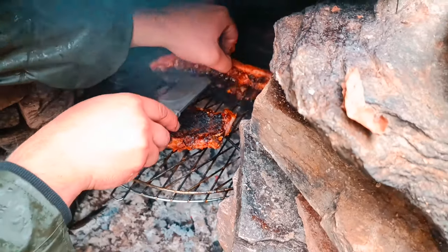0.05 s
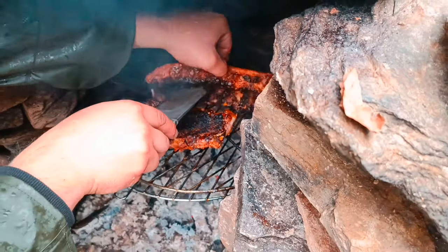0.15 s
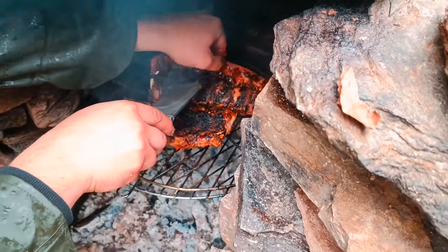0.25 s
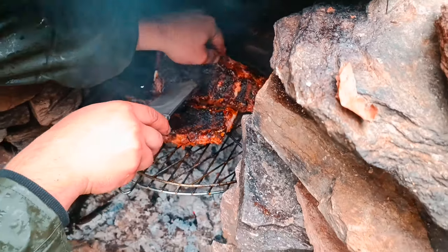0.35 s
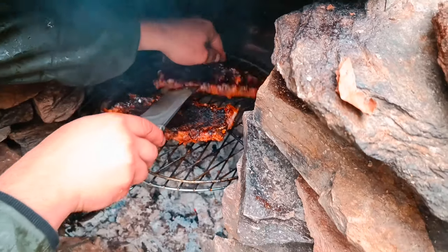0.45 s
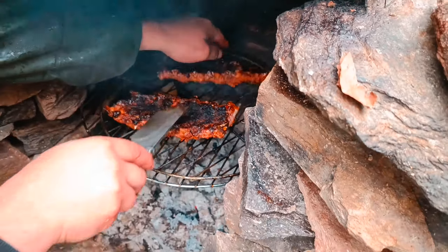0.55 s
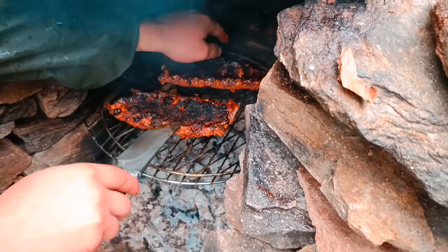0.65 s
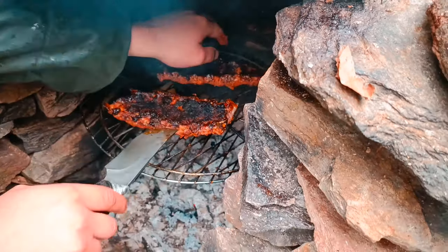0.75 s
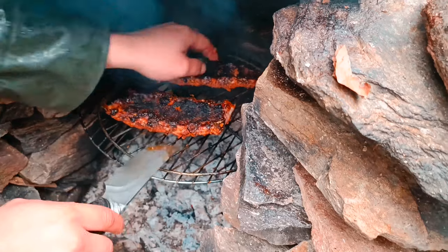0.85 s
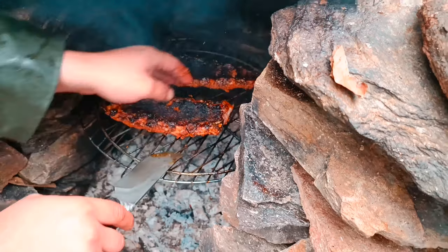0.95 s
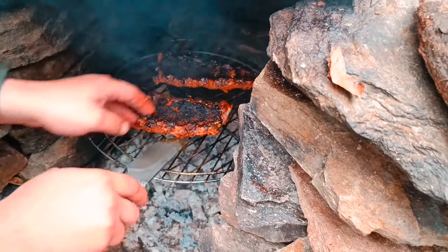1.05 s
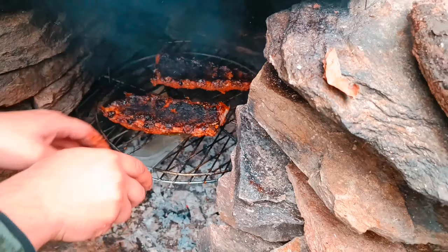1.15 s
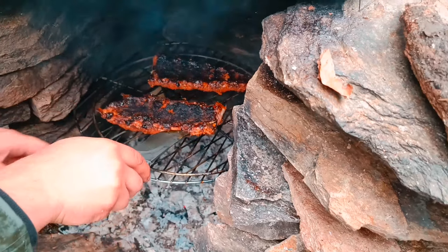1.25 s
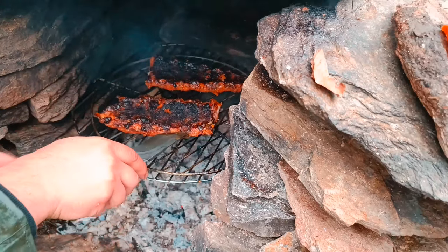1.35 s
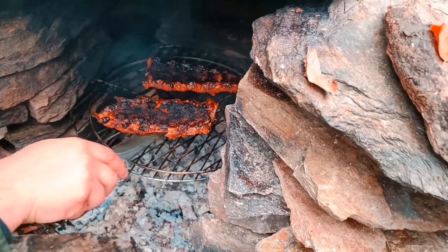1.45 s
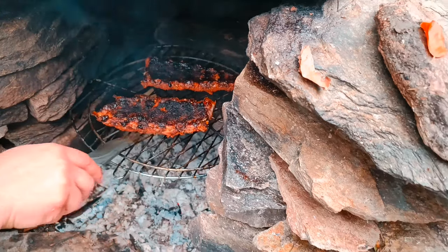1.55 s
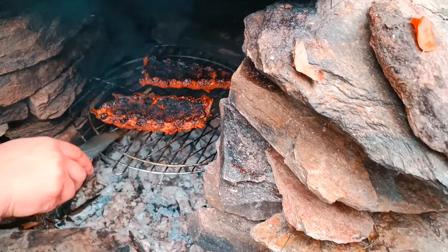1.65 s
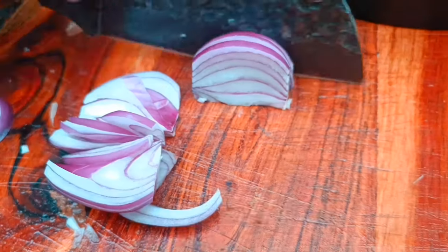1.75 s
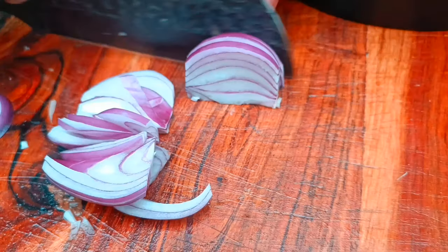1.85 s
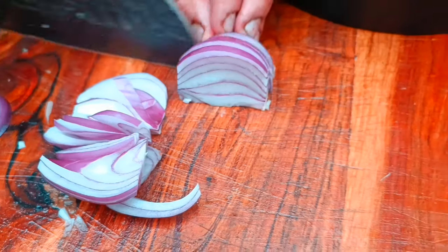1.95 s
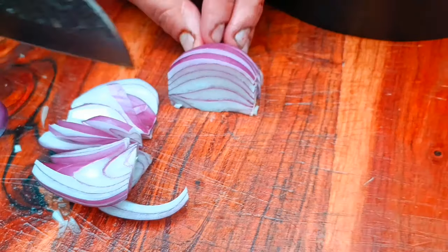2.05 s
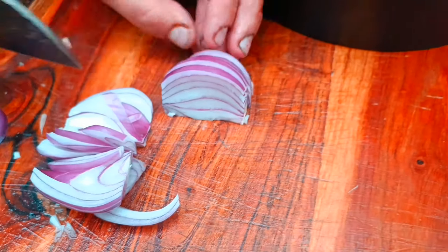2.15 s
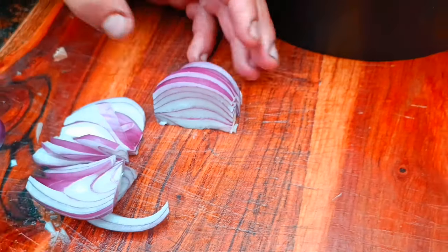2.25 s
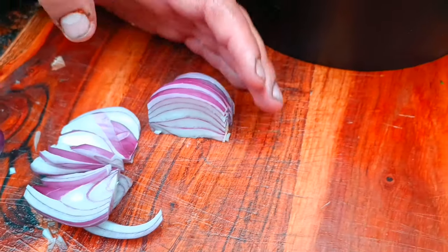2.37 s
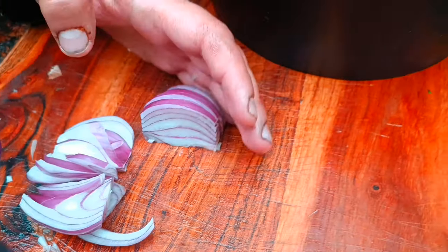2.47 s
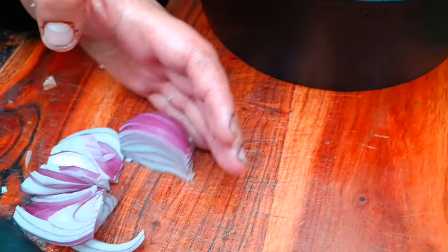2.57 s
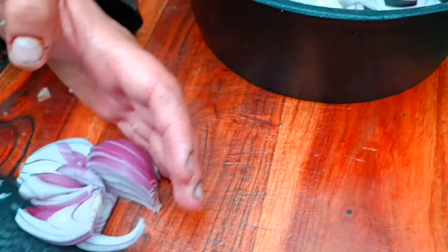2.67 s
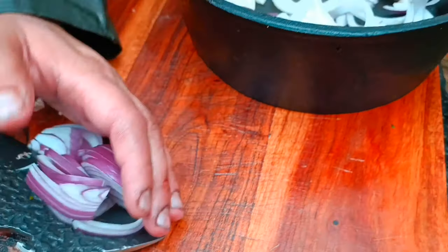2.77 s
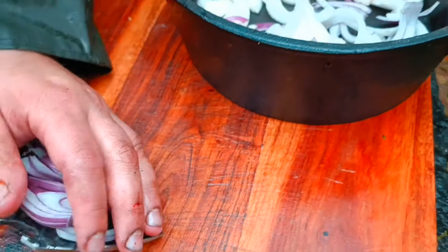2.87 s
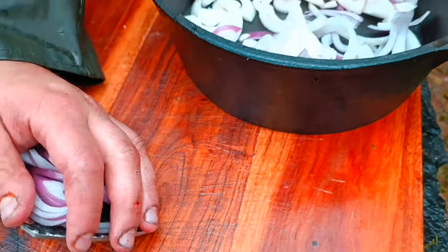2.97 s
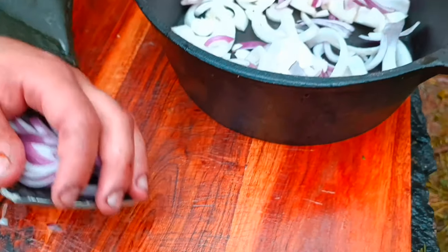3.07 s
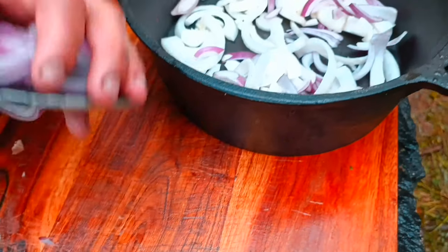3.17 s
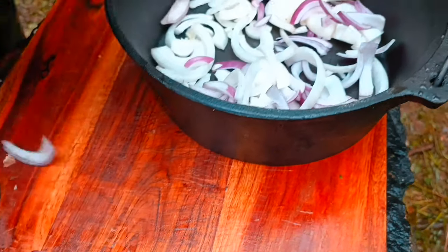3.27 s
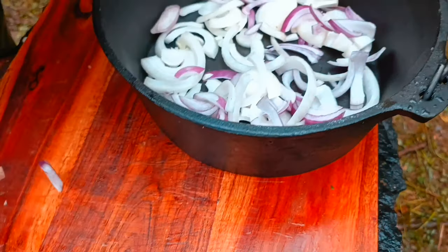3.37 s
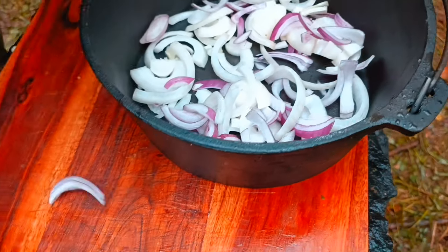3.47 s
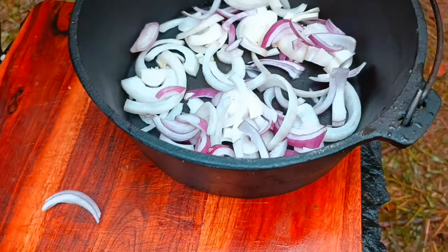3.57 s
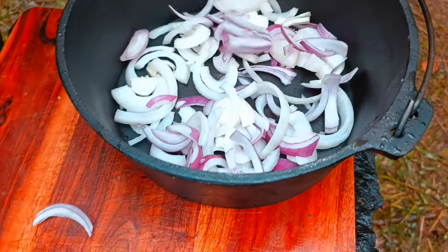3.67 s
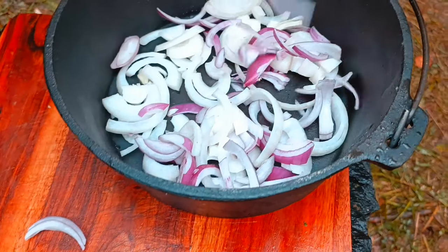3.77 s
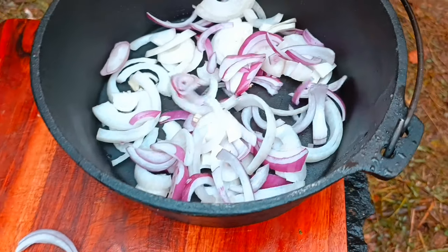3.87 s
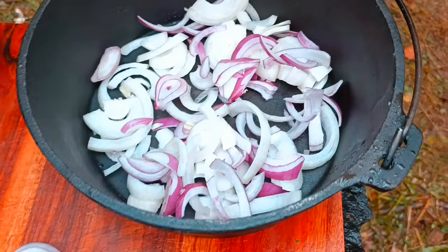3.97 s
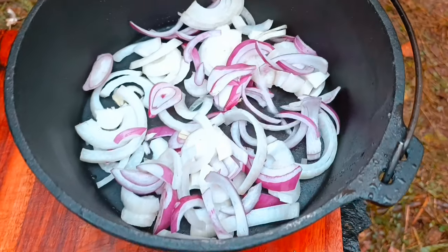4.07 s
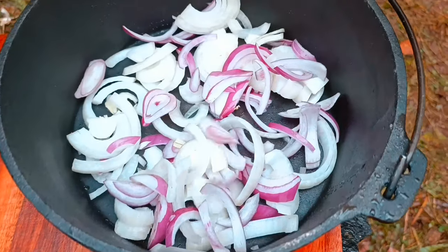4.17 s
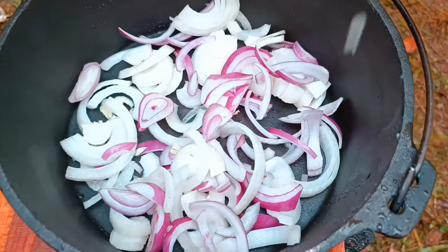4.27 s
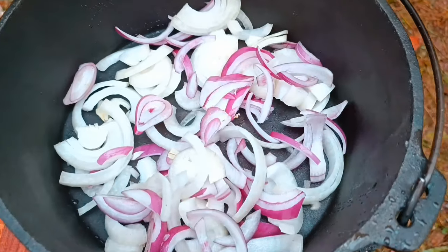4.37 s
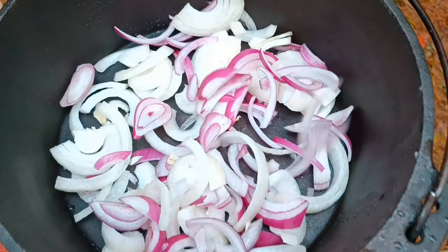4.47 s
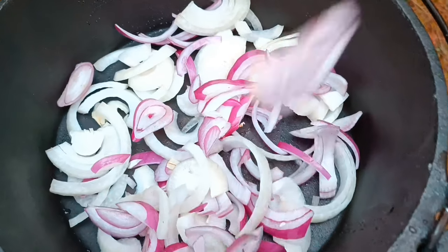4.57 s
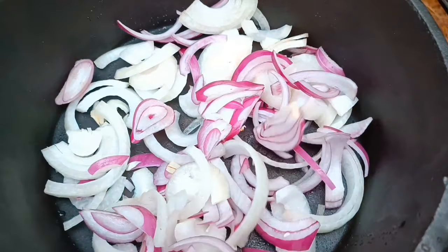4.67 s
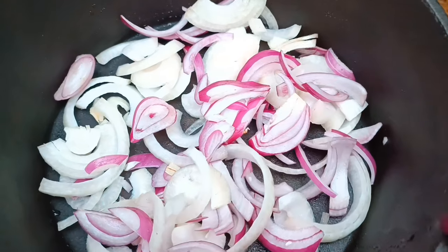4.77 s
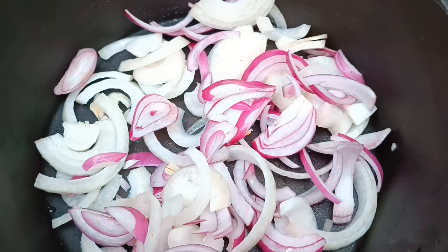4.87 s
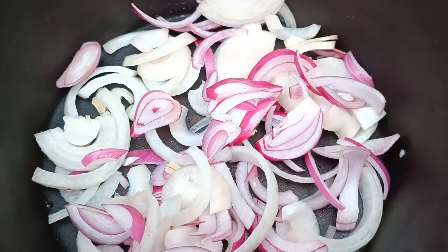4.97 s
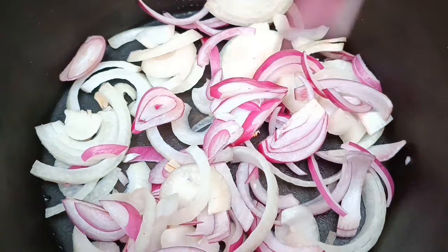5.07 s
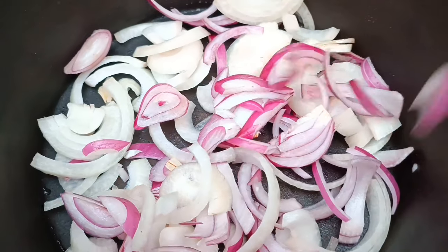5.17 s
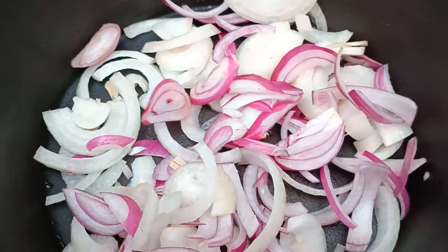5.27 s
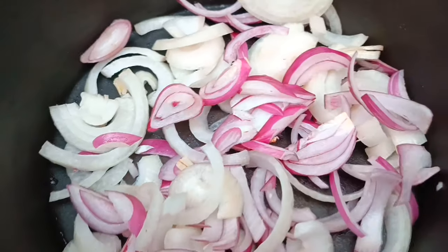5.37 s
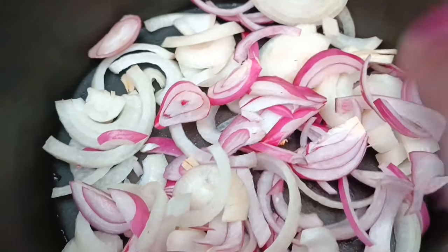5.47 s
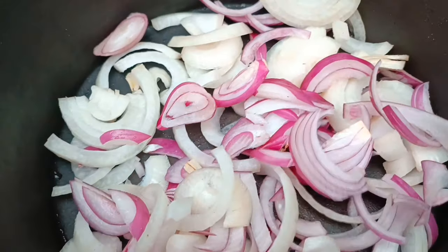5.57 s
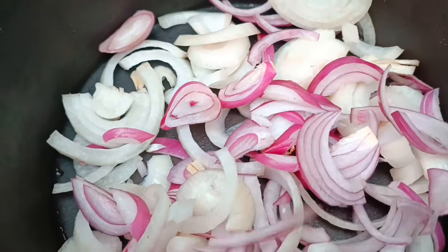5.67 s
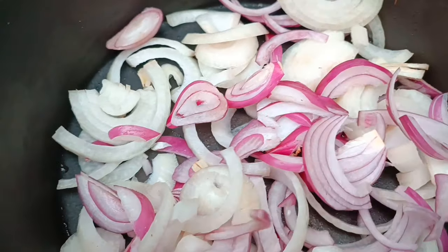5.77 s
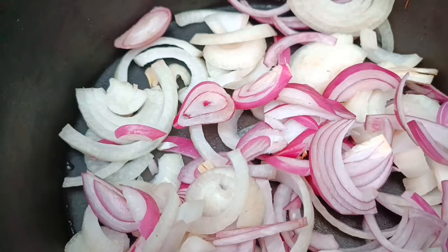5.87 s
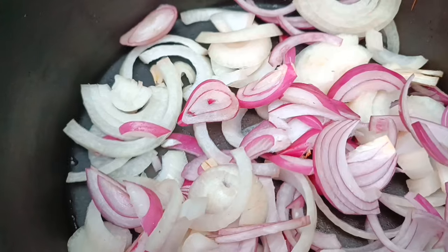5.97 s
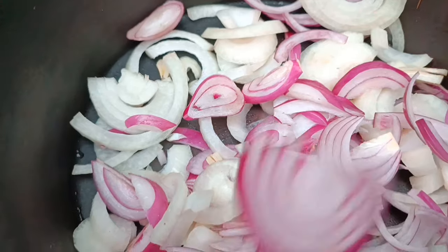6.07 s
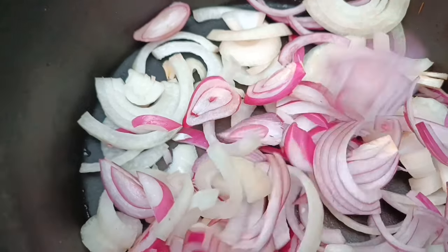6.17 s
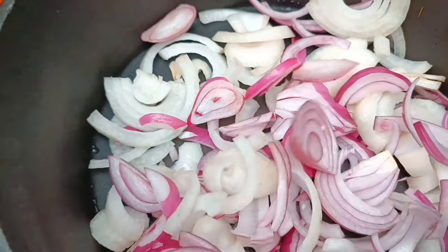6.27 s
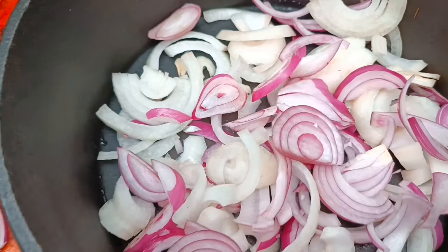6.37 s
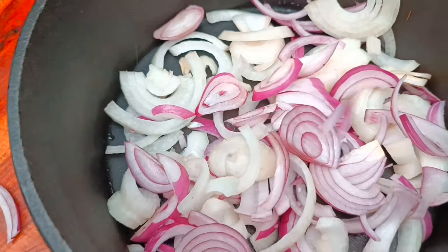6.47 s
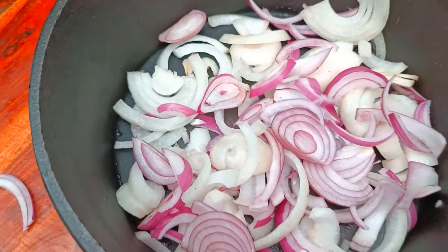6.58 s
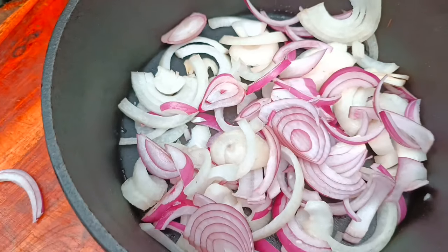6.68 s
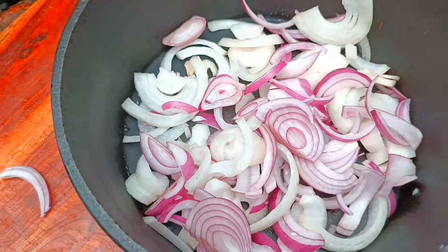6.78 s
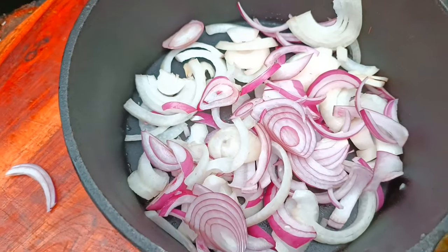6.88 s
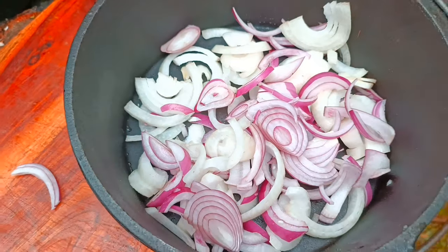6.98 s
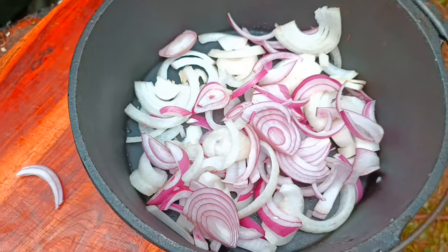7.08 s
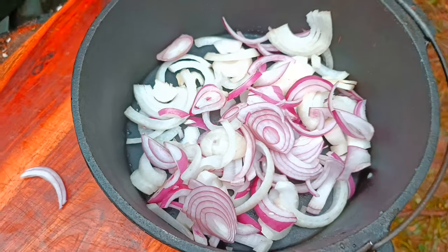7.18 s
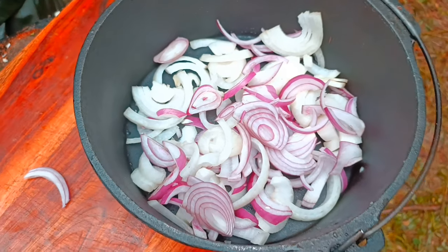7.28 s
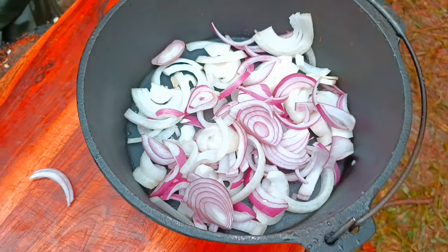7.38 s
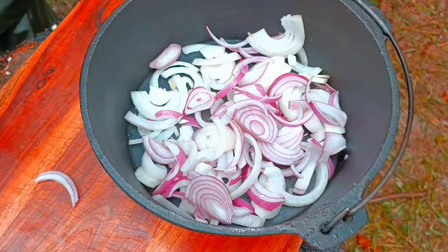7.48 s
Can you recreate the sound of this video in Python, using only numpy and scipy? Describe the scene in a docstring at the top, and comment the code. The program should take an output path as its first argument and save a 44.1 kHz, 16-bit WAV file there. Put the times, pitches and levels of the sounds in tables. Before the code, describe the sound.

A close, dry stereo outdoor scene with a soft low rumble throughout. From 0 to 1.6 s fat sizzles faintly as fine crackle on the left, swelling near 0.7 s, with sleeve rustle and dull soft bumps around 0.2 and 1.0 s. At 1.65 s the sound drops out for an instant, then a blade knocks hard on a wooden board at 1.75 s, short and damped. Cloth rustles more strongly while the edge drags with a hollow rasp until 2.1 s. Another solid knock lands at 2.56 s, with lighter ones and quick gritty scooping slips to 2.9 s. From 3 to 4.3 s onion slices patter and tick wetly, densest near 3.9 s. At 4.8 s steel rattles in a brief bright, quiet ring. Sparse ticks and taps continue from 5.15 to 6.6 s, a soft bump comes at 6.9 s, and a last tick at 7.5 s.

```python
"""Chopping board by the fire pit

Hands work beside an outdoor fire pit, heard by two spaced microphones.
A cleaver knocks on a wooden board (damped wood tones), then slides and scoops up sliced onion (rough slips).
It rattles on metal (ringing steel tones); slices patter and tick (tiny clicks and short noise bursts).
Fat sizzles at first and sleeves rustle (crackling noise) over soft bumps and a low outdoor rumble.
Early on, the sound drops out for a moment."""
import sys
import numpy as np
from scipy import signal
from scipy.fft import rfft, irfft, next_fast_len
from scipy.io import wavfile

SR = 44100
rng = np.random.default_rng(int(sys.argv[2]) if len(sys.argv) > 2 else 0)


def store_pcm(level_fs):
    """Save levels as 16-bit WAV."""
    pcm = np.round(np.clip(level_fs, -1, 1) * 32767).astype(np.int16)
    wavfile.write(sys.argv[1], SR, np.atleast_2d(pcm).T)


N = 332073

SPACING_MS, FULL_SIDE_DB = 0.42, 3.5    # longest lag between microphones; level difference that nears it


def amp(db):
    """Turn dB into a plain gain."""
    return 10 ** (np.asarray(db) / 20)


def rms_one(x):
    """Scale to an average strength (rms) of 1."""
    return x / np.sqrt(np.mean(x ** 2) + 1e-20)


def in_time(rows):
    """Draw straight lines between table rows, one value per sample for each column."""
    times_s, *columns = np.transpose(rows)
    return [np.interp(np.arange(N) / SR, times_s, column) for column in columns]


def stroke(rows):
    """Gain that follows a level curve and is silent outside it."""
    times_s, levels_db = np.transpose(rows)
    return amp(np.interp(np.arange(N) / SR, times_s, levels_db, left=-200, right=-200))


def at_hz(points, hz):
    """Read a table by pitch, on a log axis as the ear hears pitch."""
    table = np.array(points)
    return np.interp(np.log(hz), np.log(table[:, 0]), table[:, 1])


def band(x, low_hz, high_hz):
    """Keep only the pitches between two limits."""
    sos = signal.butter(2, [low_hz, high_hz], "band", fs=SR, output="sos")
    return signal.sosfilt(sos, x + 1e-18)


def drift(rate_hz):
    """Slow random wandering with a spread of 1, worked out every 40 samples."""
    r = np.exp(-80 * np.pi * rate_hz / SR)
    noise = rng.standard_normal(N // 40 + 2002)
    slow = signal.lfilter([1], [1, -2 * r, r * r], noise)[2000:]    # skip the start-up
    return np.interp(np.arange(N) / 40, np.arange(len(slow)), rms_one(slow))


def resonate(x, hz, width_hz):
    """Ring at one pitch like a struck object; a narrow width rings longer; gain 1 at the peak."""
    r = np.exp(-np.pi * width_hz / SR)
    feed = np.array([1, 0, -1]) * (1 - r * r) / 2
    return signal.lfilter(feed, [1, -2 * r * np.cos(2 * np.pi * hz / SR), r * r], x + 1e-18)


def body(x, peaks, damping=1):
    """An object's tones side by side, with alternating signs; damping widens and so shortens them."""
    return sum((-1) ** k * amp(db) * resonate(x, hz, width_hz * damping)
               for k, (hz, width_hz, db) in enumerate(peaks))


def grains(per_s, spread_db, size):
    """Random clicks of uneven strength, scaled to rms 1."""
    strength = amp(spread_db * np.minimum(rng.exponential(1, size), 5))
    signed = strength * rng.choice([-1, 1], size)
    return rms_one(signed * (rng.random(size) < per_s / SR))


def pair(near, other, alike):
    """Mix two signals into a left and right that are partly the same."""
    share = np.clip(alike, -1, 1)
    common = np.sqrt(1 + share) * near
    opposed = np.sqrt(1 - share) * other * np.array([[1], [-1]])
    return (common + opposed) / np.sqrt(2)


def lead(stereo, ms):
    """Delay the right side (or the left, if negative)."""
    late = int(ms > 0)
    out = stereo.copy()
    out[late] = np.roll(stereo[late], round(abs(ms) * SR / 1000))
    return out


# tones of the wooden board, for knocks and scoops: (f/Hz, undamped width/Hz, relative level/dB)
BOARD_TONES = [(171, 29, -6.5), (391, 21, -4), (519, 32, 1), (750, 40, -6.5), (1034, 43, -7.5),
               (1455, 65, -15), (1875, 82, -13.5)]
# blows on the board: (t/s, peak level before left-right tilt/dB, damping factor [at least 0.5 is used],
#                      settling share [ratio], lowest f stirred/Hz, highest f stirred/Hz)
KNOCK_BLOWS = [(1.668, -19, 4.6, 0.07, 166, 980), (1.7536, -4.5, 3.1, 0.05, 324, 1720),
               (2.5556, -7.5, 1.8, 0.096, 165, 1180), (2.653, -23, 2, .05, 250, 1200),
               (2.743, -17, 1.8, 0.055, 250, 1200), (2.878, -23.5, 3, 0.046, 220, 1300),
               (3.287, -30, 0.82, 0.04, 460, 1780), (3.51, -25, 1.1, 0.078, 670, 1810),
               (3.623, -41.5, 0.75, 0.069, 450, 1800)]


def knocks():
    """A soft push sets the board's tones ringing, damped by the blade that stays on it."""
    length = round(.12 * SR)
    t = np.arange(length) / SR
    noise = rng.standard_normal((len(KNOCK_BLOWS), 2, length))
    out = np.zeros((2, N + length))
    for (s, peak_db, damping, share, low_hz, high_hz), settle in zip(KNOCK_BLOWS, noise):
        push = (t == 0) + share * pair(*settle, 0.91) * np.exp(-t / 0.0067)    # the blow, then the blade settles
        soft = signal.sosfilt(signal.butter(3, high_hz, fs=SR, output="sos"), push)
        ring = band(body(soft, BOARD_TONES, max(damping, .5)), low_hz, 2500)
        edge_crack = 0.0042 * band(settle * np.exp(-t / .002), 3000, 6500)
        knock = ring + edge_crack
        at = round(s * SR)
        out[:, at:at + length] += amp(peak_db) * lead(-knock / np.abs(knock).max(), .1) * amp([[.7], [-.7]])
    return out[:, :N]


SCOOP_RISE_DB_PER_S, SCOOP_FALL_DB_PER_S = 906, 750    # into and out of contact


def scoop_gain(column, swell_db_per_s):
    """Each scoop rises fast, swells while it pushes, then falls away."""
    t, out = np.arange(N) / SR, 0
    for row in SCOOP_PUSHES:
        start_s, push_s = row[:2]
        since, left = t - start_s, start_s + push_s - t
        rise_db = SCOOP_RISE_DB_PER_S * np.maximum(-since, 0)
        swell_db = swell_db_per_s * np.clip(left, 0, abs(push_s))
        fall_db = SCOOP_FALL_DB_PER_S * np.maximum(-left, 0)
        loss_db = rise_db + swell_db + fall_db
        out = out + amp(row[column] - np.minimum(loss_db, 200))
    return out


WOOD_SWELL_DB_PER_S, EDGE_SWELL_DB_PER_S = 46, 113    # the load grows during the push
EDGE_FOCUS_DB = 43    # loss one octave away from the edge pitch
# the flat blade scoops: (t/s, push length/s, wood level at end of push/dB, wet edge level there/dB, edge f/Hz)
SCOOP_PUSHES = [(2.617, 0.039, -32, -39, 5600), (2.682, 0.024, -29.5, -37, 5200),
                (2.717, 0.03, -27.5, -34, 4100), (2.786, 0.023, -65, -48.5, 4620),
                (2.886, 0.014, -34.5, -41.5, 4900), (3.294, 0.0026, -41.5, -44, 5000),
                (3.755, 0.0069, -47, -49, 5000)]
# tones of the wet edge: (f/Hz, width/Hz, relative level/dB)
EDGE_TONES = [(3080, 660, 4), (4100, 460, 2), (5380, 400, -0.5), (6250, 320, -6.5)]


def scoops():
    """Uneven slips ring the board's tones; the wet edge grates above, coloured by the blade's angle."""
    slips = pair(*grains(3000, 2.6, size=(2, N)), 0.94)
    slips = slips * amp(1.9 * np.tanh(drift(35)))    # stick and slip in lumps
    pushed = slips * scoop_gain(column=2, swell_db_per_s=WOOD_SWELL_DB_PER_S)
    wood = body(pushed, BOARD_TONES) / np.std(body(slips, BOARD_TONES))
    grit = grains(2500, 3.45, size=(2, N)) * scoop_gain(column=3, swell_db_per_s=EDGE_SWELL_DB_PER_S)
    pitch_hz, = in_time([(s + push / 2, hz) for s, push, *_, hz in SCOOP_PUSHES])
    ragged = 0
    for hz, width_hz, db in EDGE_TONES:
        off_pitch_db = EDGE_FOCUS_DB * np.log2(hz / pitch_hz) ** 2
        gain = amp(db - off_pitch_db + 4.1 * np.tanh(drift(25)))
        ragged = ragged + resonate(grit * gain, hz, width_hz)
    edge = amp(12.5) * band(ragged, 2650, 8700)
    return lead(band(wood, 91, 2310), .13) * amp([[1.5], [-.4]]) + edge * amp([[2.2], [-2.2]])


# the blade tilts up and back: pitch of the hollow at rest and at full tilt, middle and half-length of the tilt
DRAG_REST_HZ, DRAG_TILT_HZ, TILT_S, TILT_SPAN_S = 626, 840, 1.923, 0.12
# the blade's edge drags over the grain: (t/s, level/dB)
DRAG_LEVEL = [(1.665, -31), (1.69, -45), (1.735, -52), (1.77, -41), (1.85, -33), (1.89, -37), (2.03, -34),
              (2.07, -25), (2.095, -31), (2.13, -50)]


def drag():
    """Slips on the grain ring a hollow under the blade, whose pitch moves with the tilt."""
    span = slice(round(DRAG_LEVEL[0][0] * SR), round(DRAG_LEVEL[-1][0] * SR))
    t = np.arange(N)[span] / SR
    tilt = np.clip(1 - ((t - TILT_S) / TILT_SPAN_S) ** 2, 0, 1)
    centre_hz = DRAG_REST_HZ + (DRAG_TILT_HZ - DRAG_REST_HZ) * tilt
    slips = pair(*grains(4000, 2.1, size=(2, len(centre_hz))), 0.65)
    sound = 0
    for hz in np.geomspace(400, 1900, 20):
        octaves = np.log2(hz / centre_hz)
        above_db = -9 * np.maximum(octaves, 0) ** 1.1
        below_db = -26 * np.maximum(-octaves, 0) ** 3.2
        gain = amp(above_db + below_db + 3.3 * drift(25.0)[span])
        sound = sound + gain * resonate(resonate(slips, hz, 69), hz, 69)
    out = np.zeros((2, N))
    out[:, span] = rms_one(sound) * amp([[.9], [-.9]])
    return stroke(DRAG_LEVEL) * out


CHATTER_ABOVE_HZ = 2930    # tones below this answer only to the hardest hit
# tones of the steel: (f/Hz, relative level/dB, time to fall by 60 dB/s)
STEEL_TONES = [(566, -2, 0.22), (2924, -1.5, 0.3), (3120, 4.5, 0.042), (3350, 1, 0.048),
               (4290, -1.5, 0.042), (4615, -1, 0.09), (5430, -5, 0.1), (5907, -5, 0.08), (6550, 3, 0.06),
               (7110, 7, 0.06), (7300, 2, 0.082), (9080, -1, 0.067), (10370, 0.5, 0.12)]
# single hits on the steel: (t/s, relative level/dB)
STEEL_BLOWS = [(4.7944, -48), (4.8046, -36.5), (4.8203, -33.5)]
# quick chatter around the hits: (t/s, relative level/dB)
CHATTER_LEVEL = [(4.803, -53), (4.808, -57.5), (4.818, -58.5), (4.824, -54), (4.845, -59.5), (4.865, -71.5)]


def steel():
    """Hits and a short chatter ring the steel; each tone reaches the two sides differently."""
    start, length = round(4.78 * SR), round(.4 * SR)
    chatter = grains(12000, 3.1, size=N) * stroke(CHATTER_LEVEL)
    hits = np.zeros(N)
    for s, db in STEEL_BLOWS:
        hits[round(s * SR)] = amp(db)
    force = (chatter + hits)[start:start + length]
    hits = hits[start:start + length]
    hardest = hits * (hits == hits.max())
    # many weaker tones crowd between the main ones
    hz, chance = np.geomspace(2950, 13500, 150), rng.standard_normal((150, 2))
    crowd_hz = hz * (1 + .006 * chance[:, 0])
    crowd_db = -9 - 5 * np.log2(hz / 5500) ** 2 + 2.5 * np.tanh(chance[:, 1])
    crowd = np.c_[crowd_hz, crowd_db, np.full(len(hz), .05)]
    ring, crack = 0, amp(18) * hits
    for hz, db, t60_s in [*STEEL_TONES, *crowd]:
        width_hz = np.log(1000) / np.pi / t60_s
        push = force if hz > CHATTER_ABOVE_HZ else hardest
        tone = amp(db) * resonate(push, hz, width_hz)
        tone = tone * SR / (np.pi * width_hz)    # before its level, a unit click rings at height 1
        lag_ms = 0.28 * rng.uniform(-0.75, 1) * min(hz / 6000, 1) ** 3
        ring = ring + rng.choice([-1, 1]) * lead(np.array([tone, tone]), lag_ms)
    low = band(ring, 280, 1170) + amp(28) * band(force, 120, 1400)    # lowest tone and dull contact
    high = ring + crack
    for _ in range(3):    # steep edges: the steel is stiff, with little between low and high
        high = band(high, 2600, 15000)
    out = np.zeros((2, N))
    out[:, start:start + length] = (low + high) * amp([[.5], [-.5]])
    return out


TICK_T60_S = 0.026    # time for the splash to fall by 60 dB
# small wet ticks and taps, relative levels:
# (t/s, treble level/dB, middle level/dB, thud level/dB, left minus right level/dB)
TICK_EVENTS = [(1.385, -47.5, -50, -51, -5), (1.803, -36.5, -61, -62, -1), (1.826, -35.5, -58, -58, -0.5),
               (2.926, -44, -51, -68, 1.5), (2.952, -38.5, -58, -70.0, -0.5), (3.103, -41, -43.5, -68, -1),
               (3.203, -37, -49, -48, -7.5), (3.258, -37, -45, -39.5, -4.5), (3.514, -65, -43, -40.5, 3),
               (3.565, -45.5, -48.5, -70, 1.5), (3.622, -46, -76, -49, -1), (3.719, -43.5, -43.5, -79, 0),
               (3.842, -49, -46.5, -54, 0.5), (3.875, -38, -41, -44, 1.5), (3.893, -47, -54, -58, 5),
               (3.908, -42, -43, -63, 4), (3.918, -40, -46, -62, 1), (3.929, -42.5, -51, -63, 1.5),
               (3.972, -50, -37.5, -51, 1.5), (3.981, -52, -38, -57, 0.5), (4.148, -46.5, -46.5, -44.5, -6),
               (4.261, -30.5, -39.5, -49, -5.5), (4.425, -47, -53, -65, -2.5),
               (4.466, -40, -58, -52.5, 4.5), (4.618, -42.5, -55, -55, -1.5),
               (4.639, -50, -55.5, -44.5, 7.5), (5.152, -40.5, -41.5, -48.5, -3),
               (5.18, -32.5, -37, -39.5, -7), (5.215, -54, -52, -49, -3.5), (5.392, -52, -49, -40.5, 1.5),
               (5.452, -43, -64, -80, -13), (5.566, -49, -53, -46, 0), (5.678, -35.5, -38.5, -41.5, -2.5),
               (6.007, -48, -53, -43.5, -8), (6.118, -38, -41, -40.5, 3), (6.124, -45, -53, -45, -3.5),
               (6.176, -46, -33.5, -41.5, -1.5), (6.202, -35.5, -37, -43, 3.5), (6.578, -50, -50, -47, 0.5),
               (6.591, -41.5, -43.5, -83, 3), (7.492, -45.5, -42, -48, 2)]
# colouring of the ticks' treble: (f/Hz, width/Hz, relative level/dB)
TICK_TREBLE_COLOUR = [(4800, 1200, -19), (6620, 930, 7), (10800, 2100, -3), (13700, 690, -2)]


def ticks():
    """Each is a snap and a dying splash; the far microphone hears it later and weaker."""
    length = round(.06 * SR)
    t = np.arange(length) / SR
    noise = rng.standard_normal((len(TICK_EVENTS), 2, length))
    fall = amp(-60 * t / TICK_T60_S) + 2.4 * np.exp(-t / 0.000094)    # splash, then the snap
    fall[-40:] = 0    # room for the lag
    layers = np.zeros((3, 2, N + length))
    for (s, treble_db, middle_db, thud_db, pan_db), (near, other) in zip(TICK_EVENTS, noise):
        lag_ms = SPACING_MS * np.tanh(pan_db / FULL_SIDE_DB)
        burst = lead(pair(near, other, 0.6) * fall, lag_ms) * amp([[pan_db / 2], [-pan_db / 2]])
        at = round(s * SR)
        layers[:, :, at:at + length] += amp([treble_db, middle_db, thud_db])[:, None, None] * burst
    treble, middle, thud = layers[:, :, :N]
    # the gains make up for the narrower bands
    bright = amp(13) * body(treble, TICK_TREBLE_COLOUR)
    return bright + amp(16.5) * band(middle, 1134, 5250) + amp(18.5) * band(thud, 213, 1880)


# loose slices crackle as they tumble: (t/s, relative level/dB)
PATTER_LEVEL = [(3.0, -91), (3.6, -46), (3.8, -45.5), (3.92, -43.5), (4.05, -51.5), (5.3, -64), (5.44, -46),
                (5.6, -76)]


def patter():
    """Sparse tiny clicks each ring briefly at one of ten pitches, each pitch in its own place."""
    clicks = grains(900, 3.0, size=N) * stroke(PATTER_LEVEL)
    pitches_hz, dealt = np.geomspace(1500, 8000, 10), rng.integers(0, 10, N)
    out = 0
    for k, hz in enumerate(pitches_hz):
        ring = amp(12) * resonate(clicks * (dealt == k), hz, hz / 11.2)
        out = out + lead(np.array([ring, ring]), 0.31 * rng.uniform(-1, 1))
    return out


SIZZLE_LAG_MS = 0.39    # the right side hears it this much later
# fat sizzles over the embers: (t/s, relative level/dB)
SIZZLE_LEVEL = [(0.0, -66), (0.4, -59), (0.72, -51), (1.2, -56.5), (1.65, -65.5)]


def sizzle():
    """Fine dense crackle from one spot on the left, reaching that microphone first."""
    main = band(grains(9000, 2.2, size=N), 3500, 5700)
    top = amp(-6) * band(grains(9000, 2.2, size=N), 10000, 10800)
    fizz = rms_one(main + top)
    return stroke(SIZZLE_LEVEL) * lead(np.array([fizz, fizz]), SIZZLE_LAG_MS) * amp([[2.5], [-2.5]])


SHAKE_DB, SHAKE_HZ = -5, 170    # the hardest knock shakes the table: push before filtering, upper limit
# soft low bumps of handling: (t/s, relative level/dB)
BUMP_EVENTS = [(0.195, -34), (.98, -24.5), (1.055, -27), (6.943, -28)]


def bumps():
    """Short dull puffs of noise partly shared by both sides, and one low shake of the table."""
    thrust = np.zeros(N)
    for s, db in BUMP_EVENTS:
        thrust[round(s * SR)] = amp(db)
    fading = signal.lfilter([1], [1, -np.exp(-1 / (0.014 * SR))], thrust)
    hardest_s = KNOCK_BLOWS[1][0]
    shake = band(amp(SHAKE_DB) * (np.arange(N) == round(hardest_s * SR)), 12, SHAKE_HZ)
    return band(pair(*rng.standard_normal((2, N)), 0.21) * fading, 69, 560) + shake


def colour(x, spectrum):
    """Make some pitches louder than others, following a table; rms 1."""
    size = next_fast_len(N)
    hz = np.maximum(np.arange(size // 2 + 1) * SR / size, 1)
    return rms_one(irfft(rfft(x, size) * amp(at_hz(spectrum, hz)), size)[..., :N])


def flickering(white, edges_hz, likeness, patchy_db):
    """Split noise into stereo bands, each with its own flicker and left-right likeness."""
    out, together = 0, drift(2.06)
    for k, (low_hz, high_hz) in enumerate(zip(edges_hz, edges_hz[1:])):
        mid, side = band(white[k % 2], low_hz, high_hz)
        flicker = amp(patchy_db * (0.43 * together + drift(18.0)))
        out = out + flicker * pair(mid, side, at_hz(likeness, np.sqrt(low_hz * high_hz)))
    return out


RUSTLE_LIKENESS = 0.15    # once the lag between the sides is allowed for
# slow changes, for rustle and rumble: (t/s, rumble level/dB, rustle left minus right level/dB)
SLOW_LEVELS = [(0.1, -53.5, 0), (0.6, -51.5, 7), (1.5, -54, 3), (2.35, -53, -0.5), (3.1, -55, 3.5),
               (4.4, -56.5, -3), (6.4, -57.5, -6.5), (7.2, -54.5, -3)]
# sleeves and hands moving: (t/s, rustle level below 8 kHz/dB, level above 8 kHz relative to that/dB)
SLEEVE_MOTION = [(0.0, -49.5, -9), (0.35, -53, -4), (0.9, -49, -7), (1.35, -53, -6.5), (1.72, -46.5, -3.5),
                 (1.81, -37.5, -4), (2.08, -45.5, -3), (2.2, -51.5, -3.5), (2.55, -54, -4),
                 (2.85, -54, -2.5), (3.1, -43.5, -2), (3.3, -44, -1), (3.6, -50, -5), (3.92, -45.5, -3.5),
                 (4.1, -49.5, -6.5), (4.38, -51.5, -4), (4.72, -53, -6), (5.55, -52.5, -7.5),
                 (5.85, -54.5, -8), (6.75, -55.5, -9), (7.45, -52.5, -4.5)]
# colour of the rustle: (f/Hz, relative level per Hz/dB)
RUSTLE_COLOUR = [(410, -39.5), (700, -16), (2080, -3.5), (4050, -1), (5300, -0.5), (6600, 3), (7300, -3.5),
                 (7800, -9.5), (10100, -7), (11700, -9.5), (16000, -13.5)]


def rustle():
    """Cloth rubs as many grains on hiss; livelier motion is crisper and the nearer side hears it first."""
    _, pan_db = in_time(SLOW_LEVELS)
    rustle_db, top_db = in_time(SLEEVE_MOTION)
    crisp = 0.48 * amp(0.44 * (rustle_db + 52.5))
    hiss = rng.standard_normal((2, 2, N))
    cloth = (hiss + crisp * grains(700, 5.4, size=(2, 2, N))) / np.sqrt(1 + crisp ** 2)
    patchy = flickering(cloth, np.geomspace(600, 19000, 14), [(1, RUSTLE_LIKENESS)], patchy_db=1.46)
    rub = colour(patchy, RUSTLE_COLOUR)
    low = signal.sosfiltfilt(signal.butter(5, 8000, fs=SR, output="sos"), rub)
    rub = amp(rustle_db) * rms_one(low) + amp(rustle_db + top_db) * rms_one(rub - low)
    placed = np.where(pan_db > 0, lead(rub, SPACING_MS), lead(rub, -SPACING_MS))
    return placed * amp([pan_db / 2, -pan_db / 2])


# colour of the rumble: (f/Hz, relative level per Hz/dB)
RUMBLE_COLOUR = [(15, -55.5), (25, -15), (87, 1.5), (150, -1.5), (324, -8), (674, -9.5), (2500, -15),
                 (3250, -52), (5500, -120)]
# how alike the rumble is on both sides: (f/Hz, left-right likeness [-1 to 1])
RUMBLE_LIKENESS = [(60, 0.92), (180, 0.84), (550, 0.2), (1650, -0.25), (15000, -0.05)]


def rumble():
    """Low outdoor noise whose bands waver; its deepest part is nearly the same on both sides."""
    rumble_db, _ = in_time(SLOW_LEVELS)
    noise = rng.standard_normal((2, 2, N))
    wavering = flickering(noise, np.geomspace(20, 3600, 12), RUMBLE_LIKENESS, patchy_db=2.5)
    return amp(rumble_db) * colour(wavering, RUMBLE_COLOUR)


def scene():
    """All sources together."""
    cleaver = knocks() + scoops() + drag() + steel()
    slices = ticks() + patter()
    return cleaver + slices + sizzle() + bumps() + rustle() + rumble()


DROPOUT_START_S, DROPOUT_END_S = 1.653, 1.6645
CUTOFF_HZ = 15750


def record(dry):
    """The sound drops briefly to a hundredth of its strength; the top is cut."""
    t = np.arange(N) / SR
    outside_s = np.maximum(DROPOUT_START_S - t, t - DROPOUT_END_S)
    present = np.clip(outside_s / 0.00019, .01, 1)    # quick ramps at both ends
    top_cut = signal.ellip(10, .5, 70, CUTOFF_HZ, fs=SR, output="sos")
    return signal.sosfilt(top_cut, dry * present)


dry = scene()
out = record(dry)
store_pcm(out)
```